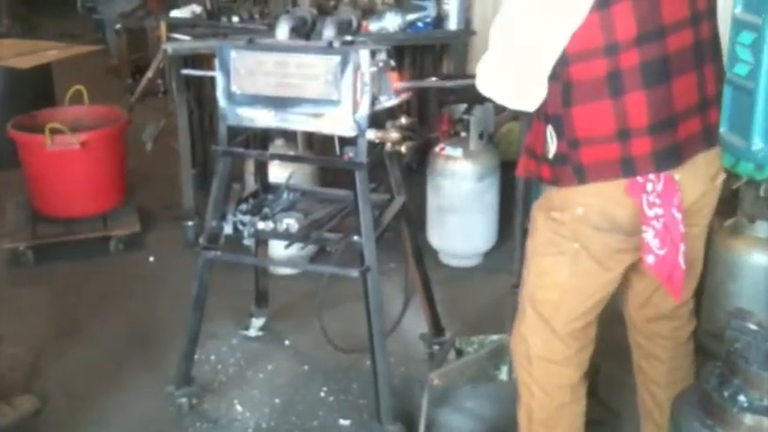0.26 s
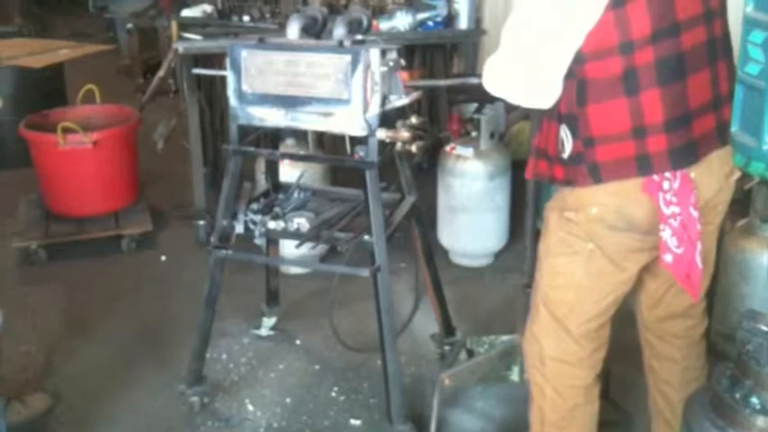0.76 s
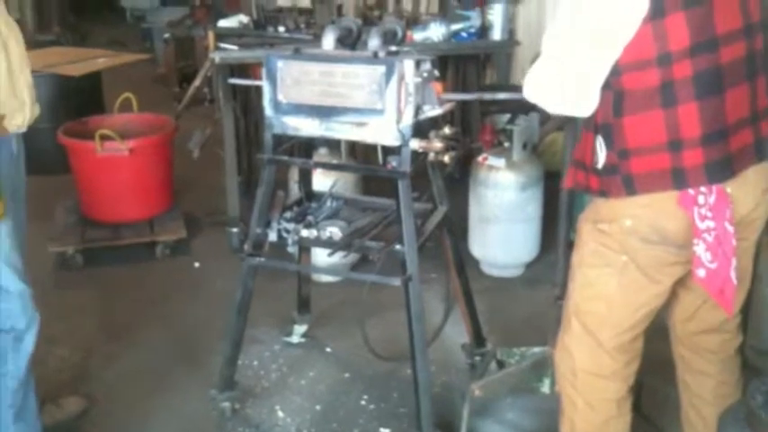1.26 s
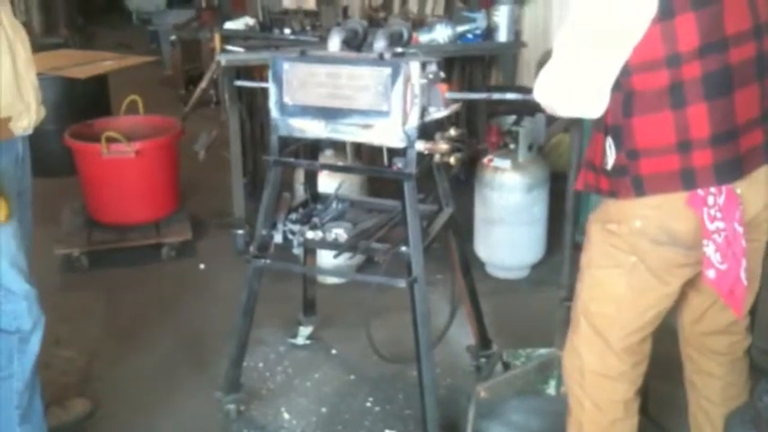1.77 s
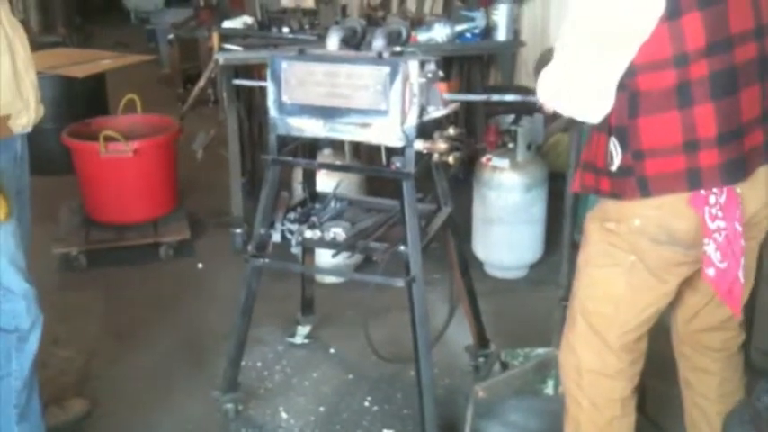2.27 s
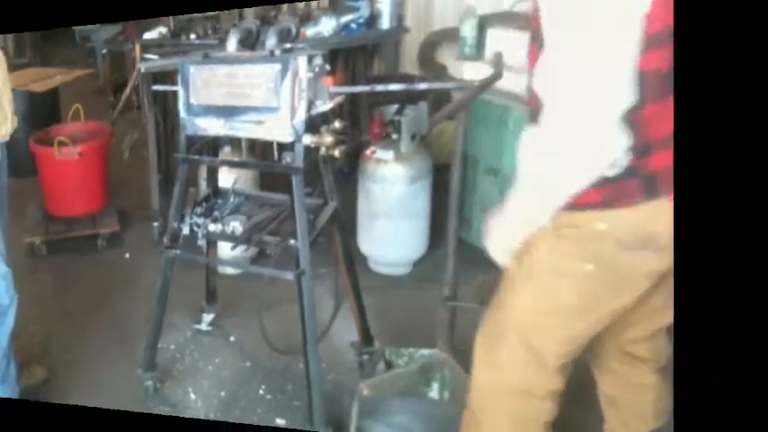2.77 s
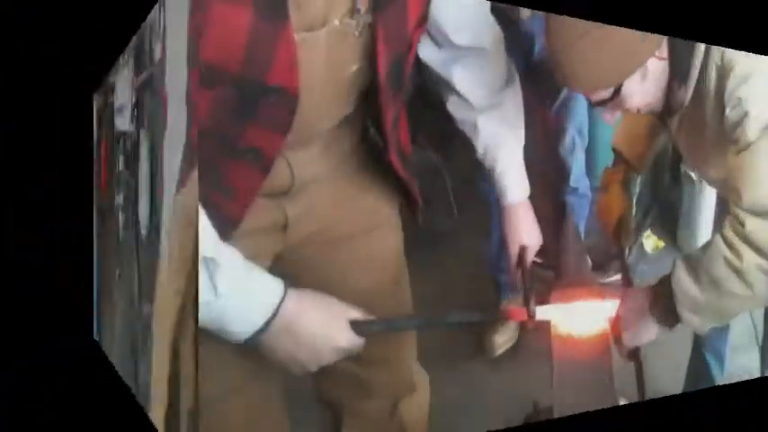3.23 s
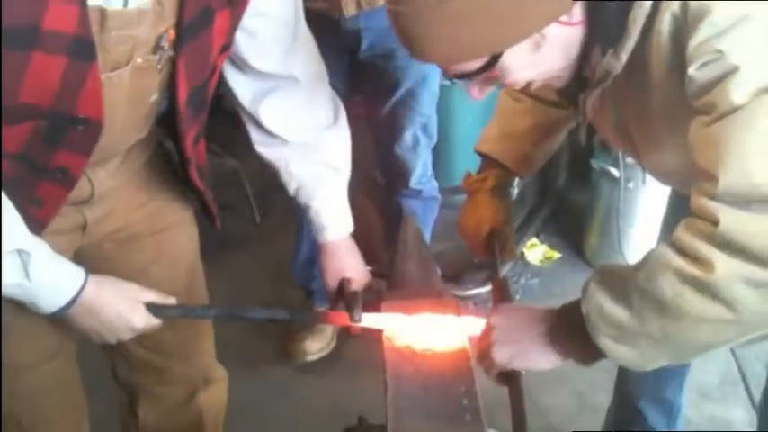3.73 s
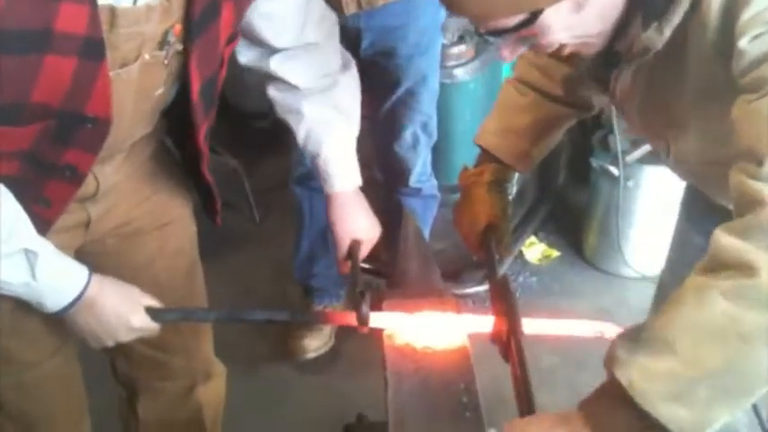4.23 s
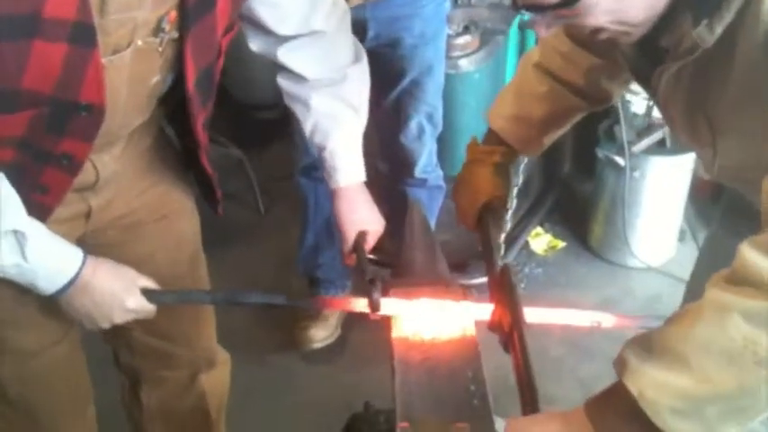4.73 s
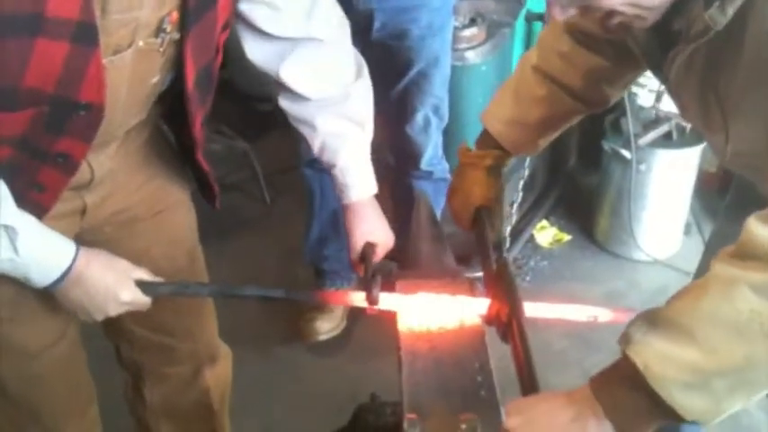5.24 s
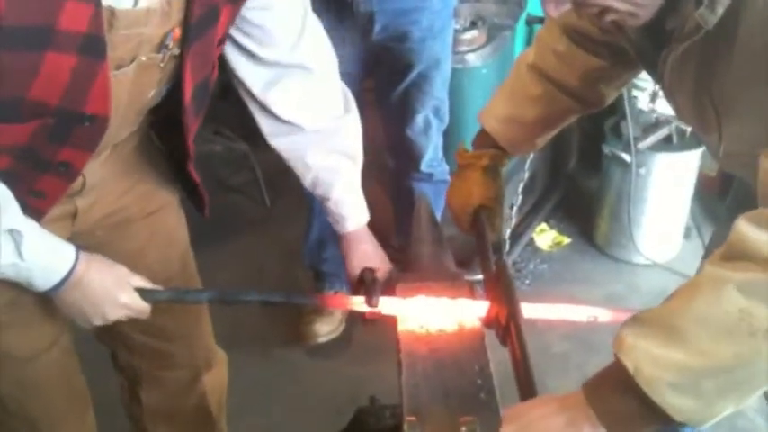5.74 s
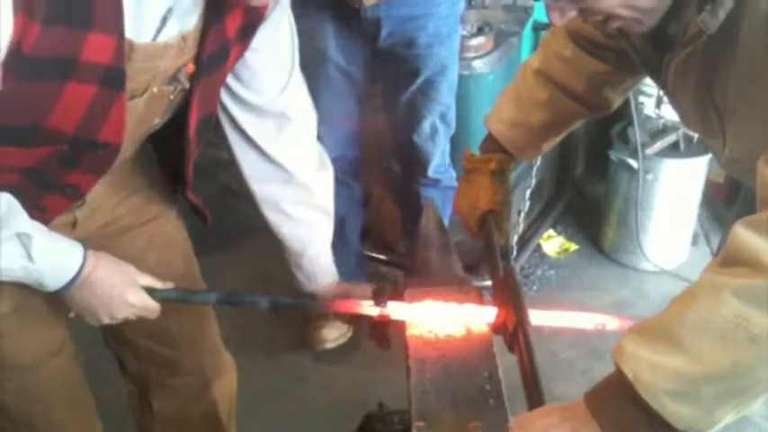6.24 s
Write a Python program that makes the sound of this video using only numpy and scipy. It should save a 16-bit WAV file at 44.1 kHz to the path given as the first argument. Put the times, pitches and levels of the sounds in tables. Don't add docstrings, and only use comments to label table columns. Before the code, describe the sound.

Loud, slightly overdriven gas pulses fill a metalworking shop, steady and quick like a machine panting, with flame rumbling underneath. They sink away, and a far quieter corner emerges: a brief groan and squeak of rubbed steel, gritty scrapes, a cluster of small ticks, one wrench knock, then sparse, faint clicks. Low distant rumble and light room echo remain, heard through one microphone.

```python
import sys
import numpy as np
from scipy import signal
from scipy.fft import rfft, irfft, next_fast_len
from scipy.io import wavfile
from scipy.ndimage import uniform_filter1d

SR = 44100
rng = np.random.default_rng(int(sys.argv[2]) if len(sys.argv) > 2 else 0)


def gain_from_decibels(decibels):
    exponent = np.asarray(decibels, float) / 20
    return 10 ** exponent


def output_pcm(signal):
    pcm = np.clip(np.atleast_2d(signal).T, -1, 1) * 32767
    wavfile.write(sys.argv[1], SR, np.round(pcm).astype(np.int16))


N = 286650


def jet(t):
    rise_s = 0.037
    stroke_db = stroke(t, rise_s, hold_s=0.013, fall_db_per_s=331, bend=2.5)
    leak_db = -15.5 + stroke(t, rise_s, hold_s=0.1, fall_db_per_s=400)
    return gain_from_decibels(2 * np.maximum(stroke_db, np.where(t > 0, leak_db, -90)))


def breath(t):
    return gain_from_decibels(2 * stroke(t - 0.12, rise_s=0.024, hold_s=0.032, fall_db_per_s=331))


# start_s, jet_db, breath_db, thump_db
PUFFS = [(-.208, -3.5, -4, 0.), (0.042, 0.5, -1.5, 1), (.291, 1, -2, 1.5), (0.546, 0, -2, -1.5),
         (.796, 0.5, 0, -5.5), (1.046, 1, -0.5, -1.5), (1.297, 1, 0, 2), (1.55, 1, 0.5, 1),
         (1.802, 1.5, -0.5, -1), (2.05, 2, 1, 2.5), (2.3, 1.5, -1, -2.5), (2.552, 1, 0, -4.5),
         (2.807, 1, 0., 2.5), (3.056, 1, 1, 1.5), (3.308, 2.5, 1.5, -10), (3.56, 2.5, 3.5, 2),
         (3.803, -0.5, -14, -14)]
# pitch_hz, level_db (per Hz)
JET_SPECTRUM = [(410, -44.5), (700, -15), (1390, -14.5), (2240, -5), (2490, -9), (2940, -8), (3180, -7),
                (3910, -7.5), (4390, -9.5), (5200, -5), (7560, -1.5), (10600, -2.5), (11900, 0.5),
                (15400, -5.5)]
BREATH_SPECTRUM = [(1470, -38.5), (2500, -6), (3310, -21), (3950, -22), (5030, -2), (5860, -1), (7360, 0),
                   (8700, -4.5), (9390, -6), (10900, -7), (13700, -6), (15400, -16)]
HISS_SPECTRUM = [(530, -35.5), (900, -5), (1360, -11.5), (1790, -0.5), (1900, -5.5), (2720, -6.5),
                 (3330, -3), (4810, -5.5), (5950, -0.5), (7290, -2.5), (9240, -6.5), (13700, -15.5),
                 (15400, -13)]


def burner():
    jet_db, breath_db, hiss_db = -9, -22, -24
    t, hz = frame_grid(size=512)
    lag_s = 0.009 * np.clip(np.log2(12000 / (hz + 1)), 0, 1.2)
    jets = sum(gain_from_decibels(2 * db) * jet(t - lag_s - s) for s, db, _, _ in PUFFS)
    breaths = sum(gain_from_decibels(2 * db) * breath(t - s) for s, _, db, _ in PUFFS)
    flutter = gain_from_decibels(0.9 * evened(uniform_filter1d(rng.standard_normal(len(t)), size=4)))
    power = gain_from_decibels(2 * jet_db) * unit_power(JET_SPECTRUM, hz) * jets * flutter
    power = power + gain_from_decibels(2 * breath_db) * unit_power(BREATH_SPECTRUM, hz) * breaths
    power = power + gain_from_decibels(2 * hiss_db) * unit_power(HISS_SPECTRUM, hz)
    return noise(power, patchy_db=1.6, size=512)


# pitch_hz, level_db (per Hz)
ROAR_SPECTRUM = [(35, -62.5), (60, -41.5), (107, -19), (176, -7), (222, -0.5), (319, -2.5), (417, -9.5),
                 (518, -7.5), (569, -10), (725, -13.5), (829, -22), (1190, -17.5), (1500, -16), (1950, -43),
                 (3300, -120)]
# time_s, level_db
FADE = [(0, 4), (2.45, 3.5), (2.8, 1), (3.05, -1), (3.3, -4.5), (3.549, -9), (3.7, -13.5), (3.8, -15.5),
        (3.92, -15), (4.02, -48), (4.12, -67), (6.5, -97)]


def fire_box(fade):
    thump_db, catch_s, thump_hz, thump_t60_s = -19, 0.036, 225, 0.11
    t, hz = frame_grid(size=2048)
    thump = ring([(thump_hz, 0, thump_t60_s), (1.4 * thump_hz, -5, thump_t60_s)], swell_s=0.023)
    thumps = np.zeros(N)
    for s, _, _, db in PUFFS[1:]:
        add(thumps, s + catch_s, gain_from_decibels(thump_db + db) * thump)
    choke_db = sum(-0.5 * bell(t - s, 0.025) for s, *_ in PUFFS)
    flare_db = sum(2 * bell(t - s - 0.044, 0.03) for s, *_ in PUFFS)
    flame_db = 4.5 - 33 + 0.93 * np.interp(t, *np.transpose(FADE)) + choke_db + flare_db
    bass_cut = 1 + (95 / (hz + 1)) ** 8
    roar = noise(unit_power(ROAR_SPECTRUM, hz) * gain_from_decibels(2 * flame_db) / bass_cut, patchy_db=1.8, size=2048)
    return roar + fade * thumps


# pitch_hz, width_hz, lift_db
TUBE = [(121.3, 6.9, 9), (230, 30, 5), (316, 20, 3), (520, 27, 3), (750, 66, 4.5), (1300, 28, 5),
        (1532, 75, 6), (1963, 50, 5.5), (2280, 75, 3.5), (3680, 40, -1), (5920, 150, 3), (7450, 250, 2),
        (11700, 200, 0.5)]
# start_s, level_db, swell_s
CLINK = (1.449, -18., .008)
# pitch_hz, level_db, t60_s
RUNG_MODES = [(1500, -12., .1), (1950, -13., .15), (4011, -4., .09), (4800, -8., .07), (5180, -3., .06),
              (5330, -3., .11), (6358, -8., .06)]


def forge():
    ceiling, bend = 0.7, 0.055
    fade = gain_from_decibels(np.interp(np.arange(N) / SR, *np.transpose(FADE)))
    gas = burner()
    gas = colour(gas + gain_from_decibels(-12) * room(gas), TUBE)
    start_s, level_db, swell_s = CLINK
    add(gas, start_s, gain_from_decibels(level_db) * ring(RUNG_MODES, swell_s))
    gas = ceiling * np.tanh(gas / ceiling)
    return fade * (gas + bend * gas ** 2) + colour(fire_box(fade), TUBE)


# start_s (full pressure), hold_s,
# release_db_per_s, hiss_db, bar_db
DRAGS = [(3.95, 0.13, 150, -52, -67), (4.157, 0.037, 170, -40, -46.5), (4.34, .04, 147, -44, -54),
         (4.388, .005, 110, -42.5, -53), (4.54, .24, 97, -61.5, -66), (4.743, .03, 150, -57, -70),
         (4.823, .035, 57, -52.5, -72), (5.41, .1, 60, -68.5, -69), (5.6, .17, 120, -72, -74),
         (5.715, .01, 110, -62, -76), (6.39, .12, 100, -63.5, -67)]
# pitch_hz, level_db (per Hz)
GRIT_SPECTRUM = [(240, -43.5), (400, -14), (495, -13.5), (820, -18.5), (1260, -14.5), (1790, -10.5),
                 (2500, -13.5), (4200, -10), (4900, -13.5), (7070, -7.5), (8230, -10), (11700, -13.5),
                 (15400, -23)]


def scrape():
    bar_hz, bar_width_hz, rise_s, damping = 1790, 190, 0.029, 1.3
    t, hz = np.arange(N) / SR, frame_grid(size=512)[1]
    grit = gain_from_decibels(evened(uniform_filter1d(rng.standard_normal(N), size=60)))
    steady = unit_power(GRIT_SPECTRUM, hz) * np.ones(4 * N // 512 + 5)
    hiss = evened(grit * noise(steady, patchy_db=1.6, size=512))
    bar = resonate(grit * rng.standard_normal(N), bar_hz, bar_width_hz)
    bar = evened(resonate(bar, bar_hz, 2 * bar_width_hz))
    rub_db = np.max([db + stroke(t - s, rise_s, hold, fall) for s, hold, fall, db, _ in DRAGS], axis=0)
    sing_db = np.max([db + stroke(t - s, rise_s / damping, hold, damping * fall)
                      for s, hold, fall, _, db in DRAGS], axis=0)
    return hiss * gain_from_decibels(np.maximum(rub_db, -69.5)) + bar * gain_from_decibels(np.maximum(sing_db, -80.5) - 0.5)


# start_s, peak_db, pitch_hz
TICKS = [(4.1553, -32, 1740), (4.3904, -28, 2400), (4.4056, -25, 2300), (4.4364, -33, 7150),
         (4.4524, -35, 6820), (4.5714, -39, 8900), (4.5883, -42, 1900), (4.659, -41, 3600),
         (4.683, -34.5, 3710), (4.706, -31, 2310), (4.7224, -37, 2450), (4.742, -35, 2420),
         (4.7564, -37, 2660), (4.7672, -36, 1830), (4.778, -44, 1780), (5.014, -45, 4770),
         (5.0274, -46, 7870), (5.039, -50, 1870), (5.4331, -42, 7970), (5.693, -44, 4500),
         (6.269, -45, 2430), (6.277, -49, 2000), (6.3144, -54, 1700), (6.325, -50, 1700),
         (6.423, -48.5, 1820)]
# start_s, peak_db, pitch_hz, t60_s,
# ring_cycles
BLOWS = [(4.7075, -33., 5000, .04, .7), (4.690, -44., 3000, .02, .7), (4.386, -34., 2800, .12, 1.3),
         (4.395, -31., 2600, .1, 1.4), (4.153, -40., 560, .08, 1.3), (5.694, -43., 5500, .25, .7),
         (4.7566, -38., 6500, .02, .7), (4.7425, -42., 7500, .02, .8), (3.912, -38., 2600, .05, .8)]


def ticks():
    out, t = np.zeros(N), np.arange(4096) / SR
    blows = [(*row, 0.032, 1) for row in TICKS] + list(BLOWS)
    for s, db, hz, t60, cycles in blows:
        blow = rng.standard_normal(4096) * (gain_from_decibels(-60 * t / 0.0024) + 0.32 * gain_from_decibels(-60 * t / t60))
        body = resonate(resonate(blow, hz, hz / cycles), hz, hz / cycles)
        bright = resonate(resonate(blow, 1.4 * hz, 2 * hz), 3.2 * hz, 2 * hz)
        high_pass = signal.butter(4, 0.65 * hz, "high", fs=SR)
        snap = signal.lfilter(*high_pass, body + 0.092 * bright)
        add(out, s + 0.00095, gain_from_decibels(db) * snap / abs(snap).max())
    return out


# start_s, level_db, crack_t60_s
KNOCK = (4.279, -30.5, .07)
# pitch_hz, level_db, t60_s
WRENCH_MODES = [(192, 1.5, 0.052), (1440, -15, .08), (2000, -1, 0.063), (2420, -2, 0.064), (4240, 0, .05),
                (4500, -3, .05), (5636, -1, .05), (5900, -3, .05), (6363, -8, .065), (8958, -8, .045)]


def knock():
    out, t = np.zeros(N), np.arange(4096) / SR
    start_s, level_db, crack_t60_s = KNOCK
    crack = rng.standard_normal(4096) * (1 - np.exp(-t / 0.0018)) * gain_from_decibels(-60 * t / crack_t60_s)
    crack = resonate(resonate(crack, 5800, 8600), 5800, 8200)
    add(out, start_s, gain_from_decibels(level_db - 8) * (ring(WRENCH_MODES, 0.002)[:4096] + 1.5 * crack))
    return out


# start_s, end_s, pitch_hz, width_hz, level_db
SQUEAKS = [
    (3.88, 3.97, 1090, 60, -52.),
    (3.95, 4.02, 1060, 50, -57.),
    (3.83, 4.05, 305, 35, -50.),
    (4.527, 4.578, 4330, 50, -61.),
]


def squeaks():
    out = np.zeros(N)
    for start, end, hz, width, db in SQUEAKS:
        length = round((end - start) * SR)
        waver, flutter = uniform_filter1d(rng.standard_normal((2, length)), size=300)
        phase = 2 * np.pi * np.cumsum(hz + width * evened(waver)) / SR
        tone = np.sin(phase) * gain_from_decibels(3.1 * evened(flutter))
        add(out, start, gain_from_decibels(db) * evened(tone) * signal.windows.tukey(length, 0.6))
    return out


# pitch_hz, level_db (per Hz)
SHOP_SPECTRUM = [(35, -49.5), (60, -26), (120, -7.5), (152, -5), (215, -11.5), (305, -13.5), (384, -21.5),
                 (611, -21), (928, -26), (1020, -24.5), (2520, -35.5), (6830, -33.5), (12500, -46.5),
                 (15400, -46)]
# pitch_hz, width_hz, lift_db
HUMS = [(105, 13, 3.5), (151, 11, 6), (128, 12, -4.), (192, 12, 2.5), (299.6, 25, 2.)]


def shop():
    t, hz = frame_grid(size=2048)
    power = gain_from_decibels(2 * -52.5) * unit_power(SHOP_SPECTRUM, hz) * np.ones(len(t))
    return colour(noise(power, patchy_db=0.97, size=2048), HUMS)


# pitch_hz, t60_s
ROOM_DECAY = [(200, 1), (2000, 0.56), (8000, .3), (16000, .15)]


def room(x):
    hz, t, z = signal.stft(rng.standard_normal(SR // 2), SR, nperseg=256)
    decay = gain_from_decibels(-60 * t / read(ROOM_DECAY, hz)[:, None])
    tail = signal.istft(z * decay, SR, nperseg=256)[1]
    return signal.fftconvolve(x, np.r_[np.zeros(150), tail / np.linalg.norm(tail)])[:N]


def stroke(t, rise_s, hold_s, fall_db_per_s, bend=1):
    return -6 * (np.maximum(-t, 0) / rise_s) ** bend - fall_db_per_s * np.maximum(t - hold_s, 0)


def bell(t, width_s):
    return np.exp(-(t / width_s) ** 2)


def evened(x):
    return x / np.sqrt(np.mean(x ** 2) + 1e-20)


def read(points, hz):
    f, value = np.transpose(points)
    return np.interp(np.log(hz + 1), np.log(f + 1), value)


def add(mix, s, sound):
    part = mix[round(s * SR):][:len(sound)]
    part += sound[:len(part)]


def frame_grid(size):
    return np.arange(4 * N // size + 5) * size / 4 / SR, np.fft.rfftfreq(size, 1 / SR)[:, None]


def unit_power(points, hz):
    power = gain_from_decibels(2 * read(points, hz))
    return power / (3 * power.sum())


def noise(power, patchy_db, size):
    a, b, patches = rng.standard_normal((*power.T.shape, 3)).T
    patches = uniform_filter1d(patches, size=size // 64, axis=0)
    patches = evened(uniform_filter1d(patches, size=6144 // size, axis=1))
    z = (a + 1j * b) * np.sqrt(power) * gain_from_decibels(patchy_db * patches)
    return signal.istft(z, nperseg=size, noverlap=size - size // 4)[1][:N]


def colour(x, lifts):
    size = next_fast_len(N + SR // 4)
    hz = np.fft.rfftfreq(size, 1 / SR)
    lift_db = sum(db / (1 + (2 * (hz - f) / width) ** 2) for f, width, db in lifts)
    return irfft(rfft(x, size) * gain_from_decibels(lift_db), size)[:N]


def resonate(x, hz, width_hz):
    turn = np.exp(2j * np.pi * hz * np.arange(len(x)) / SR)
    r = np.exp(-np.pi * width_hz / SR)
    return 2 * (turn * signal.lfilter([1 - r], [1, -r], x / turn)).real


def ring(modes, swell_s):
    t = np.arange(SR // 2) / SR
    tones = sum(gain_from_decibels(db - 60 * t / t60) * np.sin(2 * np.pi * hz * t) for hz, db, t60 in modes)
    return (1 - np.exp(-t / swell_s)) * tones


def scene():
    hits = ticks() + knock() + squeaks()
    corner = scrape() + hits + gain_from_decibels(-12.5) * room(hits) + shop()
    bass_cut = signal.butter(4, 55, "high", fs=SR, output="sos")
    mono = forge() + signal.sosfilt(bass_cut, corner)
    return np.array([mono, mono])


def low_pass(x):
    return signal.sosfilt(signal.butter(12, 17010, fs=SR, output="sos"), x)


# start_s, end_s, above_hz, level_db
HUSH = (4.2655, 4.2765, 2800, -30.)


def record(dry):
    start, end, hz, db = HUSH
    level = signal.sosfilt(signal.butter(1, 12, "high", fs=SR, output="sos"), dry)
    treble = signal.sosfiltfilt(signal.butter(2, hz, "high", fs=SR, output="sos"), level)
    hush = np.interp(np.arange(N) / SR, [start - 0.004, start, end, end + 0.001], [0, 1, 1, 0])
    level = level - hush * (1 - gain_from_decibels(db)) * treble
    band_limit = signal.firwin(511, 15750, window=("kaiser", 9), fs=SR)
    mix = signal.oaconvolve(level, band_limit[None], "same")
    return low_pass(mix)


dry = scene()
out = record(dry)
output_pcm(out)
```